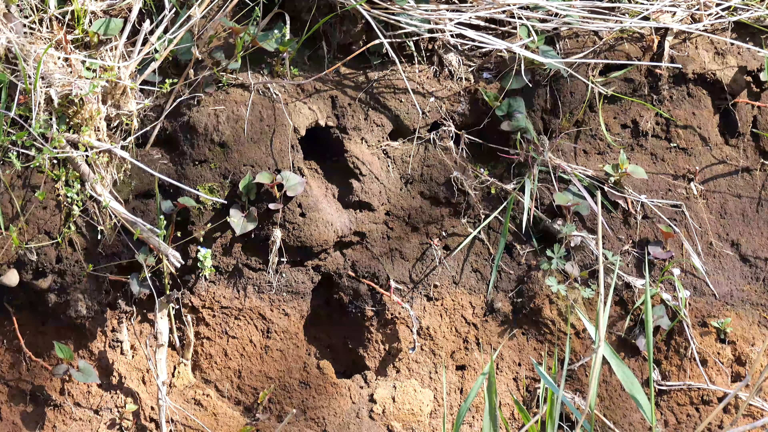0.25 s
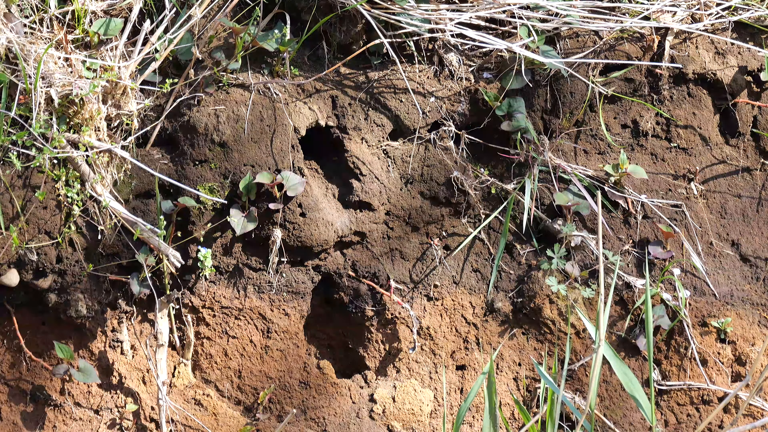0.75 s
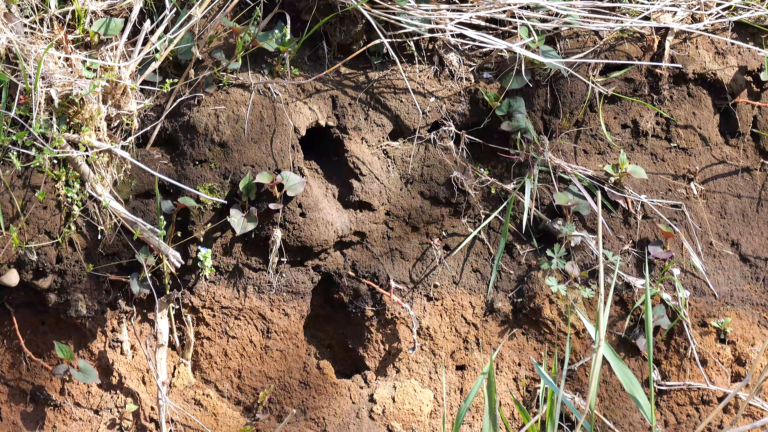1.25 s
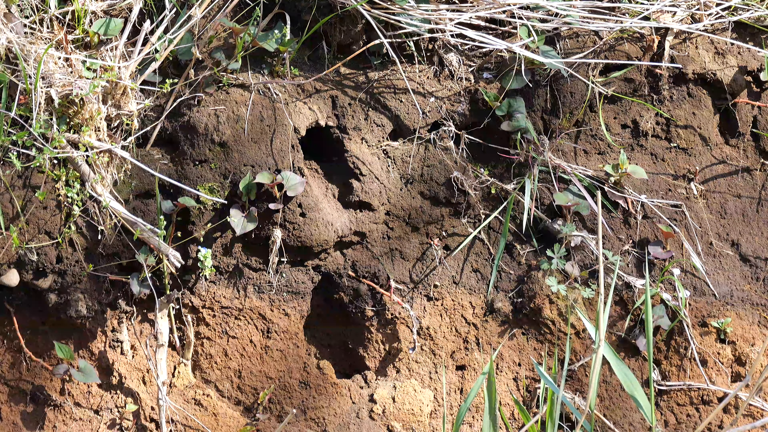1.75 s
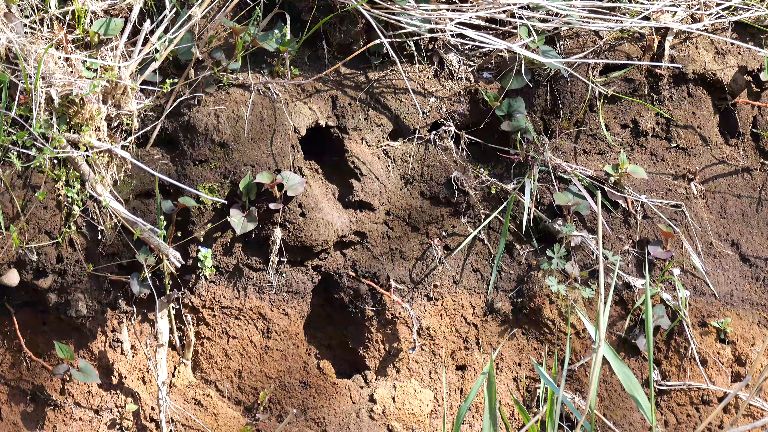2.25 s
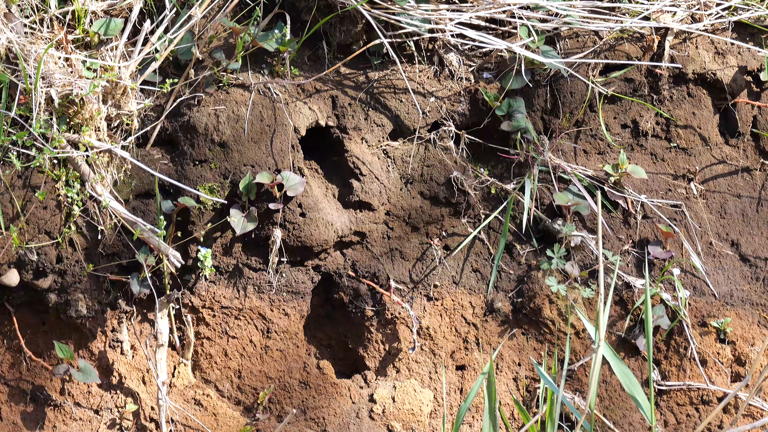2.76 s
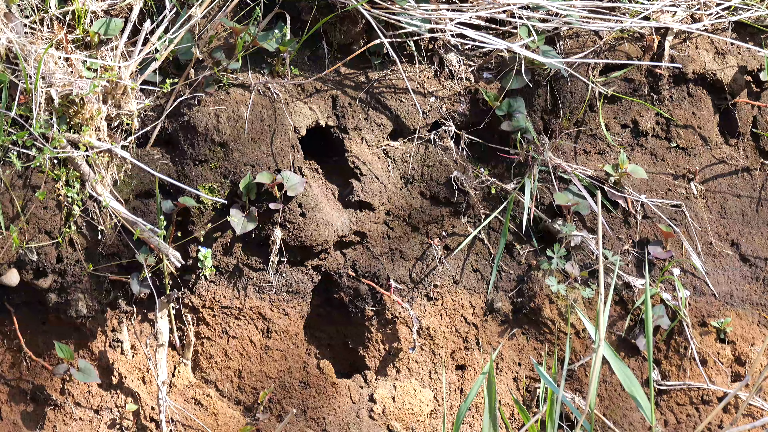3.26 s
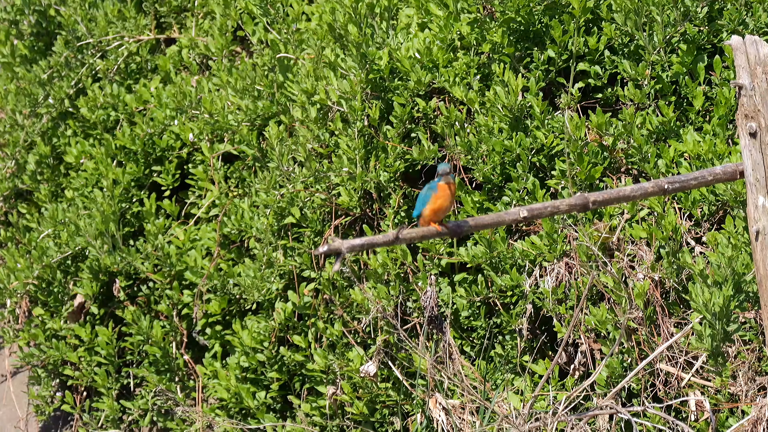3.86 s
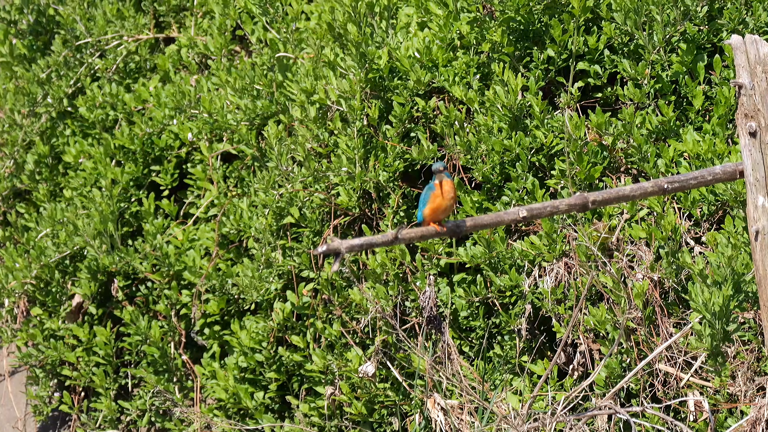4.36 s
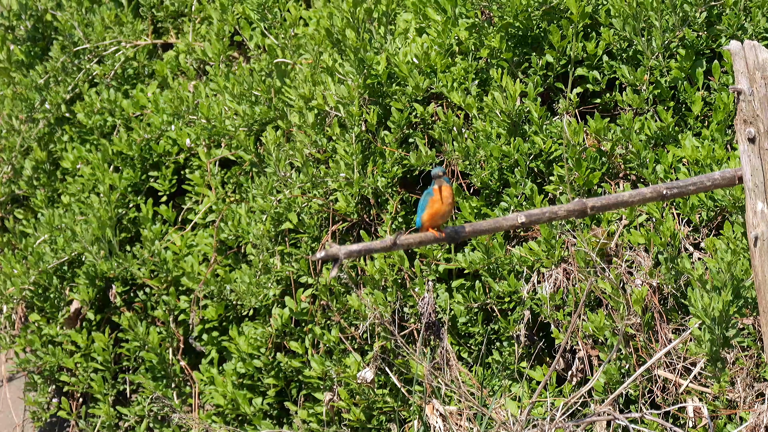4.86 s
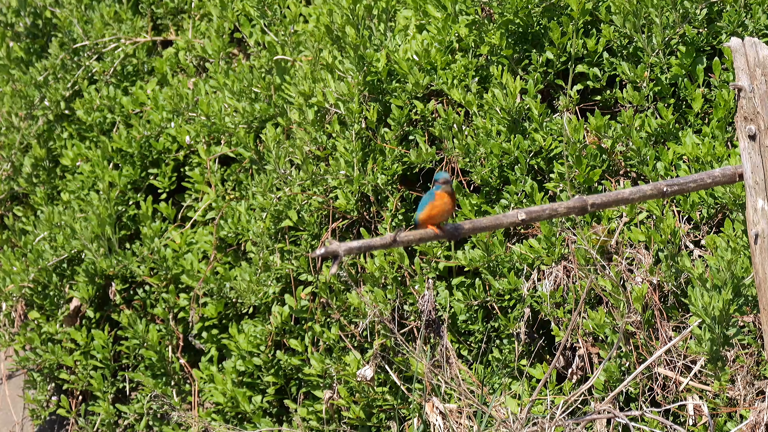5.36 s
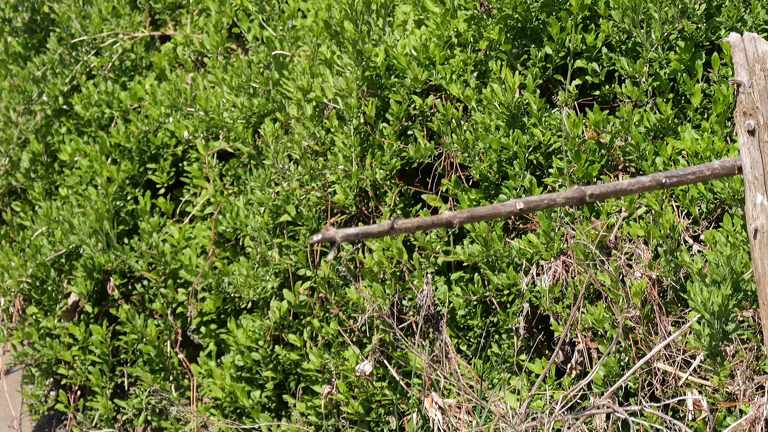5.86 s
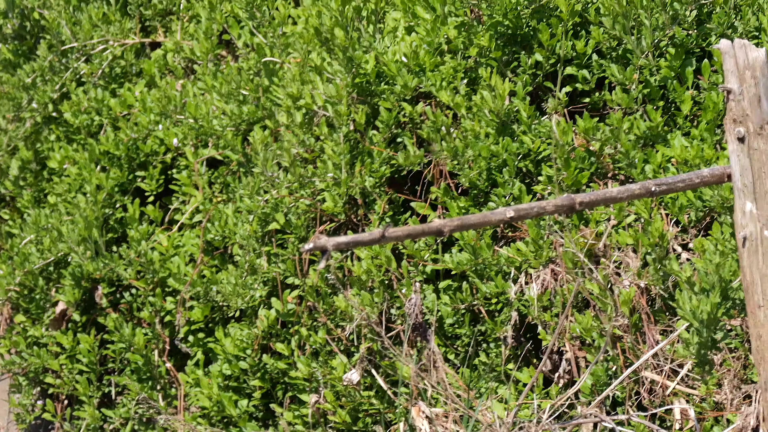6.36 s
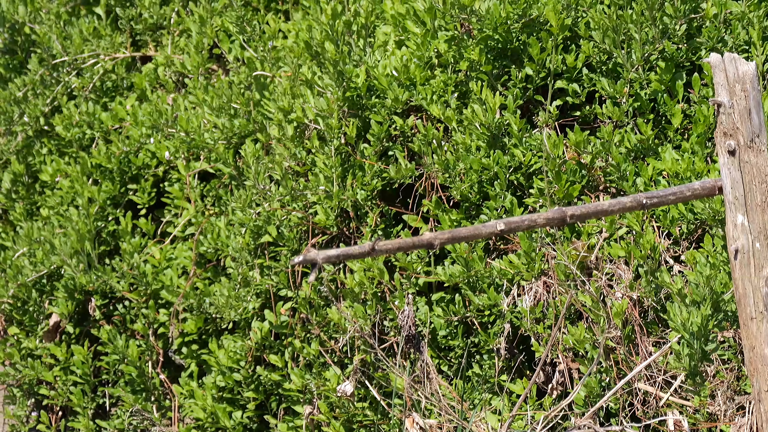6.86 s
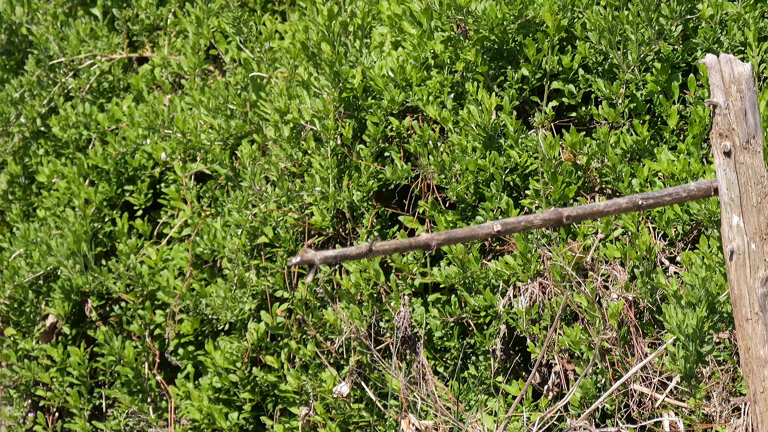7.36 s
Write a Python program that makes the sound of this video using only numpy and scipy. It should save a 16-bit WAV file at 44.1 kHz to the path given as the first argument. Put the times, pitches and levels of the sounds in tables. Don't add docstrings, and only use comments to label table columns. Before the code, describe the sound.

Near road roar and gusty leaves stop suddenly, leaving quick high bird chirps, a twig snap and piercing whistles over faint distant traffic.

```python
import sys
import numpy as np
from scipy import signal
from scipy.fft import rfft, irfft, next_fast_len
from scipy.io import wavfile
from scipy.ndimage import uniform_filter1d

SR = 44100
rng = np.random.default_rng(int(sys.argv[2]) if len(sys.argv) > 2 else 0)


def wrap_up_sound(samples):
    columns = np.atleast_2d(samples).T
    tamed = np.clip(columns, -1, 1)
    steps = np.round(tamed * 32767).astype(np.int16)
    wavfile.write(sys.argv[1], SR, steps)


def nominal_scale(level):
    x = np.asarray(level, float) / 20
    return 10 ** x


N = 335601
CUT_S = 3.688

# f/Hz, level/dB per Hz
RUSTLE_SPECTRUM = [(2000, -8), (4000, 2), (6500, -9), (9000, -20), (11500, -27.5), (14000, -37)]


def unit(x):
    return x / np.sqrt(np.mean(x ** 2) + 1e-20)


def in_time(rows, t):
    s, *columns = np.transpose(rows)
    return [np.interp(t, s, column) for column in columns]


def at_hz(points, hz):
    table_hz, values = np.array(points).T
    return np.interp(np.log(hz), np.log(table_hz), values)


def drift(rate, size):
    r = np.exp(-80 * np.pi * rate / SR)
    noise = rng.standard_normal(size // 40 + 2002)
    slow = signal.lfilter([1], [1, -2 * r, r * r], noise)[2000:]
    return np.interp(np.arange(size) / 40, np.arange(len(slow)), unit(slow))


def wide_noise(spectrum, pair, patchy_db, grain_db, size):
    likeness, balance_db, lead_rad = pair
    hz = np.maximum(np.fft.rfftfreq(size, 1 / SR), 1)
    grains = nominal_scale(grain_db * drift(130, size))
    mid, side = rfft(rng.standard_normal((2, size)) * grains) * nominal_scale(at_hz(spectrum, hz))
    top_likeness = np.clip((13500 - hz) / 5000, 0, 1)
    alike = np.clip(at_hz(likeness, hz), 0, 1) ** 0.772 * top_likeness
    left_right = np.array([[1], [-1]])
    ports = np.sqrt(1 + alike) * mid + np.sqrt(1 - alike) * side * left_right
    tilt = nominal_scale(at_hz(balance_db, hz) * (hz > 250) / 2) * np.exp(.5j * at_hz(lead_rad, hz))
    ports = ports * tilt ** left_right
    out, together = 0, drift(1.54, size)
    for octave in np.arange(4, 15):
        share = np.clip(1 - abs(np.log2(hz) - octave), 0, 1)
        flicker_db = patchy_db * (0.625 * together + drift(11.56, size))
        out = out + irfft(ports * share, size) * nominal_scale(flicker_db)
    return out / np.sqrt(np.mean(out.mean(axis=0) ** 2))


def swells(rows, t):
    power = 0
    for s, db, rise, fall in rows:
        tens_of_db = np.where(t < s, (s - t) / rise, (t - s) / fall)
        power = power + nominal_scale(db - 10 * tens_of_db) ** 2
    return power


def note(rows, overtones, wobble, flutter_db, hoarse):
    start, size = int(rows[0][0] * SR), int((rows[-1][0] - rows[0][0]) * SR)
    t = (start + np.arange(size)) / SR
    hz, level_db = in_time(rows, t)
    hz = uniform_filter1d(hz, size=150, mode="nearest") * (1 + wobble * drift(35.0, size))
    level_db = uniform_filter1d(level_db, size=220, mode="nearest")
    phase = 2 * np.pi * np.cumsum(hz) / SR
    tone = sum(nominal_scale(db) * np.sin(ratio * phase) * (ratio * hz < 15000) for ratio, db in overtones)
    hoarse = np.clip(hoarse, 0, 1)
    tone = tone * (np.sqrt(1 - hoarse) + np.sqrt(hoarse) * drift(300, size))
    edge = np.clip(np.minimum(t - t[0], t[-1] - t) / .0025, 0, 1)
    tone = np.sqrt(2) * tone * edge * nominal_scale(level_db + flutter_db * drift(50, size))
    out = np.zeros(N)
    out[start:start + size] = tone[:N - start]
    return out


def glide(row, bend, fade_db, hook_s=0):
    s, length, first_hz, last_hz, level_db = row
    onset_s, onset_db = 0.0115, -3.5
    u = np.linspace(0, 1, 12)
    hz = first_hz + (last_hz - first_hz) * (1 - (1 - u) ** bend)
    db = level_db + onset_db * np.clip(1 - u * length / onset_s, 0, 1) + fade_db * u
    rows = list(zip(s + u * length, hz, db))
    if hook_s:
        v = u[1:]
        rows += list(zip(s + length + v * hook_s, last_hz * (1 - (1 - .76) * v ** 2), db[-1] + 2.5 * v))
    return rows


def foliage(x, t60, wet_db, smear_hz=200):
    t = np.arange(int(.7 * SR)) / SR
    dull = signal.butter(2, 7000, fs=SR, output="sos")
    shared, left, right = signal.sosfilt(dull, rng.standard_normal((3, len(t))))
    tail = shared + 0.564 * np.array([left, right])
    tail = tail * nominal_scale(-60 * t / t60) * np.clip(t / 0.0059, 0, 1)
    tail = tail / np.sqrt(np.mean(np.sum(tail ** 2, axis=1)))
    moving = x * (.6 + .8 * drift(smear_hz, N))
    return x + nominal_scale(wet_db) * signal.fftconvolve(moving[None], tail, axes=1)[:, :N]


def bank(t):
    # f/Hz, level/dB per Hz
    road_spectrum = [(15, -75), (25, -45.5), (42, -40.5), (60, -26), (102, -7.5), (187, -2.5), (278, -4.5),
                     (403, -10), (1070, -15), (2710, -25), (4030, -29.5), (5540, -42), (8020, -46.5),
                     (14000, -80)]
    # f/Hz, level/dB per Hz
    leaf_spectrum = [(1500, -21), (2500, -20), (3800, 3), (5000, -5.5), (7000, -16.5), (10000, -52)]
    # f/Hz, likeness; f/Hz, L-R level/dB; f/Hz, left lead/rad
    pair = [(60, 0.995), (130, .998), (280, .995), (610, 0.978), (1330, 0.554), (2880, 0.69), (6240, 0.575),
            (13500, 0.29)], [(60, -3.5), (110, -1.5), (200, 0.0), (370, -1.0), (670, -3.5), (1220, -7),
            (2220, -6), (4060, -2.5), (7420, -6.5), (13500, -2.0)], [(300, 0), (1120, 0.23), (1720, 1),
            (2840, 0.51), (5170, 0.021), (9000, .2)]
    # t/s, level/dB
    road_levels = [(0, -25.5), (.6, -25), (1.4, -27.5), (2.0, -28.5), (3.05, -25), (3.25, -27), (3.68, -26)]
    # t/s, level/dB
    breeze = [(0, -53.5), (.3, -42), (1.4, -40.5), (1.95, -47), (2.15, -42), (3.0, -46.5), (3.25, -42),
              (3.68, -48.5)]
    # peak t/s, level/dB, rise/s per 10 dB, fall/s per 10 dB
    gusts = [
        (.275, -36.5, .03, 0.1),
        (.404, -34, .1, .12),
        (.45, -36, .1, 0.09),
        (.505, -35, 0.086, .15),
        (.72, -35, .015, .1),
        (1.29, -39, .02, 0.21),
        (2.57, -41, 0.031, 0.01),
    ]
    # peak t/s, level/dB, rise/s per 10 dB, fall/s per 10 dB
    brushes = [
        (.05, -53, 0.056, .5),
        (.402, -43.5, .02, .08),
        (.475, -41.5, .025, 0.062),
        (.52, -42, .04, 0.0347),
        (.72, -57, .015, 0.01),
    ]
    (road_db,), (breeze_db,) = in_time(road_levels, t), in_time(breeze, t)
    leaf_gain = np.sqrt(nominal_scale(breeze_db) ** 2 + swells(gusts, t))
    rustle_db = -63 + 0.55 * (breeze_db - breeze_db.mean())
    rustle_gain = np.sqrt(nominal_scale(rustle_db) ** 2 + swells(brushes, t))
    road = wide_noise(road_spectrum, pair, patchy_db=0.8276, grain_db=0.2, size=len(t))
    leaves = wide_noise(leaf_spectrum, pair, patchy_db=1.4, grain_db=1.2, size=len(t))
    rustle = wide_noise(RUSTLE_SPECTRUM, pair, patchy_db=0.5, grain_db=0.0, size=len(t))
    return nominal_scale(road_db - 0.2) * road + nominal_scale(-3.5) * leaf_gain * leaves + nominal_scale(11) * rustle_gain * rustle


def engines():
    # t/s, length/s, first f/Hz, last f/Hz, level/dB
    drones = [
        (.001, .6, 149, 144, -37),
        (.001, .55, 211, 207, -32),
        (.001, .65, 274, 265, -36),
        (.8, 1.0, 266, 260, -38),
        (1.2, .7, 186, 182, -40),
        (2.3, .85, 187, 191, -36),
        (3.2, .5, 186, 188, -37),
        (2.95, .7, 82, 72, -47),
        (.05, .45, 85, 68, -44),
    ]
    u = np.linspace(0, 1, 9)
    out = 0
    for s, length, first_hz, last_hz, db in drones:
        rows = list(zip(s + u * length, first_hz + (last_hz - first_hz) * u, db - 8 * (2 * u - 1) ** 4))
        out = out + note(rows, [(1, 0)], wobble=.008, flutter_db=2, hoarse=0)
    return out


def thicket(t):
    # f/Hz, level/dB per Hz
    road_spectrum = [(15, -87.5), (25, -43.5), (136, -1), (208, -3.5), (237, -6), (301, -3.5), (372, -15.5),
                     (414, -11.5), (448, -15), (868, -18.5), (2860, -28.5), (3350, -27), (5840, -39),
                     (9500, -54), (14000, -61)]
    # f/Hz, likeness; f/Hz, L-R level/dB; f/Hz, left lead/rad
    pair = [(60, 1), (130, 1), (280, 1), (610, 0.983), (1330, 0.586), (2880, 0.77), (6240, 0.566),
            (13500, 0.16)], [(60, -7), (110, -4.5), (200, 0.0), (370, 0), (670, 2), (1220, 5), (2220, 2.0),
            (4060, 0.5), (7420, 0), (13500, -1)], [(300, 0.0025), (2240, -0.94), (4220, 0.16)]
    # t/s, level/dB
    road_levels = [(3.7, -43.5), (4.8, -43), (5.7, -43), (6.14, -41.5), (6.4, -43), (6.99, -43.5),
                   (7.1, -43), (7.61, -43.5)]
    # t/s, level/dB
    stir = [(3.7, -66), (4.86, -62), (5.0, -68.5), (5.3, -67), (5.4, -62.5), (5.65, -75), (6.0, -61.5),
            (6.2, -60), (6.4, -63.5), (6.97, -65), (7.05, -76), (7.61, -77)]
    (road_db,), (leaf_db,) = in_time(road_levels, t), in_time(stir, t)
    road = wide_noise(road_spectrum, pair, patchy_db=0.77, grain_db=0.87, size=len(t))
    leaves = wide_noise(RUSTLE_SPECTRUM, pair, patchy_db=3.0, grain_db=0.5, size=len(t))
    return nominal_scale(road_db + 3.5) * road + nominal_scale(leaf_db + 7) * leaves


def puffs():
    # t/s, level/dB, brightness f/Hz, length/s
    bursts = [(.12, -33, 327, 0.252), (0.328, -44, 70, 0.046), (3.33, -44.5, 90, 0.147),
              (6.097, -37, 1490, 0.0049), (6.117, -39.5, 1390, 0.0058), (6.119, -47, 3200, 0.0049),
              (6.133, -38.5, 1200, 0.0049), (6.134, -45, 3400, .004), (6.116, -37.5, 557, 0.0306),
              (6.108, -50, 2600, 0.036), (4.896, -45, 3500, .005), (4.915, -45, 1100, .03),
              (6.163, -41, 400, 0.0062), (6.194, -60.5, 7000, 0.034), (7.586, -37, 200, 0.0153)]
    out = np.zeros(N)
    for s, level_db, hz, length in bursts:
        at = np.arange(max(round((s - .6) * SR), 0), min(round((s + .6) * SR), N))
        air = rng.standard_normal(2 * SR)
        band = unit(signal.sosfilt(signal.butter(2, [hz / 3, hz], "band", fs=SR, output="sos"), air))
        out[at] += nominal_scale(level_db) * band[-len(at):] * np.exp(-((at / SR - s) / length) ** 2)
    return signal.sosfilt(signal.butter(3, 55, "high", fs=SR, output="sos"), out)


def ticks():
    # t/s, level/dB, ring f/Hz, t60/s, crack level/dB
    snaps = [
        (4.881, -30, 2890, 0.0195, -56),
        (4.885, -39, 2510, 0.019, -60.5),
        (4.8934, -34, 3310, 0.0122, -39),
        (4.8966, -32, 2880, .012, -43.5),
        (4.8995, -35.5, 2505, 0.011, -47.5),
        (4.896, -31.5, 849, .025, -60.5),
        (4.917, -39, 3910, .012, -54.5),
    ]
    out, t = np.zeros(N), np.arange(1500) / SR
    crack_band = signal.butter(3, [3000, 8500], "band", fs=SR, output="sos")
    for s, level_db, hz, t60, crack_db in snaps:
        crack = signal.sosfilt(crack_band, rng.standard_normal(len(t))) * nominal_scale(crack_db - 60 * t / 0.0183)
        ring = nominal_scale(level_db - 60 * t / t60) * np.sin(2 * np.pi * hz * t) * np.clip(t / 0.00041, 0, 1)
        out[round(s * SR):][:len(t)] += ring + crack
    return foliage(out, t60=.15, wet_db=-10)


def chirps():
    # t/s, length/s, first f/Hz, last f/Hz, level/dB
    far_chirps = [
        (3.166, 0.0356, 3833, 4315, -44.5),
        (3.215, 0.0301, 3950, 4216, -44.5),
        (3.464, .02, 4550, 4700, -48.5),
    ]
    # t/s, length/s, first f/Hz, last f/Hz, level/dB
    squeak = (0.462, 0.085, 7049, 5900, -38)
    notes = 0
    for row in far_chirps:
        rows = glide(row, bend=1.2, fade_db=0)
        notes = notes + note(rows, [(1, 0)], wobble=.005, flutter_db=1.5, hoarse=.05)
    squeak_rows = glide(squeak, bend=1.1, fade_db=-7)
    notes = notes + note(squeak_rows, [(1, 0)], wobble=.04, flutter_db=3, hoarse=.9)
    return foliage(notes, t60=.2, wet_db=-8, smear_hz=80) * nominal_scale(np.array([[-1.5], [1.5]]))


def whistle(row, fade_db):
    s, length, top_hz, last_hz, level_db = row
    t = np.linspace(0, length, 40)
    scoop = np.clip(1 - t / .011, 0, 1) ** 2
    sag = (t / length) ** 2.6
    hz = top_hz * (1 - (1 - .9) * scoop) - (top_hz - last_hz) * sag
    return list(zip(s + t, hz, level_db - 4 * scoop + fade_db * sag))


def whistler():
    # t/s, length/s, top f/Hz, last f/Hz, level/dB
    short_whistles = [
        (7.181, 0.0638, 6250, 5250, -35),
        (7.59, .014, 6250, 6150, -54),
    ]
    # t/s, f/Hz, level/dB
    long_whistles = [
        [(6.327, 5600, -52), (6.333, 5730, -43), (6.34, 5794, -38), (6.366, 5574, -43), (6.375, 5450, -51),
         (6.384, 5150, -49), (6.394, 4950, -54)],
        [(4.612, 5080, -70), (4.618, 5599, -54), (4.636, 5630, -48), (4.682, 5485, -49.5), (4.698, 5423, -63.5),
         (4.706, 5453, -47), (4.718, 5226, -50.5), (4.824, 5097, -58), (4.84, 5332, -73.5)],
        [(7.36, 5430, -57.5), (7.368, 5580, -38), (7.376, 5750, -40), (7.386, 5716, -37), (7.394, 5400, -44),
         (7.402, 5594, -40), (7.41, 5656, -47.5), (7.424, 5503, -39.5), (7.44, 5398, -54.5)],
        [(7.44, 5595, -47.5), (7.454, 5690, -31), (7.48, 5504, -40.5), (7.5, 5644, -34), (7.538, 5432, -39),
         (7.56, 5300, -43), (7.588, 5400, -60)],
    ]
    pans = [-3, -1.2, -1.4, 4, -3.5, -3]
    echo_levels = [0, 0, 2, 0, -2, -7]
    # f/Hz, level/dB, t60/s
    earlier_whistle = (5400, -60.5, 1.2)
    calls = [whistle(row, fade_db=-11.5) for row in short_whistles] + list(long_whistles)
    notes = [note(rows, [(1, 0), (2, -33.0)], wobble=.003, flutter_db=2, hoarse=.03) for rows in calls]
    direct = sum(x * nominal_scale(np.array([[pan], [-pan]]) / 2) for x, pan in zip(notes, pans))
    thrown = sum(x * nominal_scale(db) for x, db in zip(notes, echo_levels))
    echoes = foliage(thrown, t60=.45, wet_db=-10, smear_hz=70) - thrown
    hz, level_db, t60 = earlier_whistle
    dying = [(CUT_S, hz, level_db), (CUT_S + t60 / 4, hz, level_db - 16.5)]
    return direct + echoes + note(dying, [(0.99, 0)], wobble=0.0027, flutter_db=2.5, hoarse=.3)


def stroke(row):
    s, length, low_hz, high_hz, level_db = row
    u = np.linspace(0, 1, 11)
    height = 1 - abs(2 * u - 1) ** 1.4
    return list(zip(s + u * length, low_hz + (high_hz - low_hz) * height, level_db - 5 * height))


def twitter():
    # t/s, length/s, first f/Hz, last f/Hz, level/dB
    sweep_rows = [(3.916, 0.11, 5690, 7560, -60), (4.331, 0.094, 5350, 7760, -61),
                  (4.715, 0.118, 3900, 7530, -55.5), (5.135, 0.154, 3950, 7840, -61.5),
                  (5.566, 0.14, 3790, 7840, -65), (6.522, .05, 6000, 9200, -66),
                  (6.76, .07, 6200, 8000, -65)]
    # t/s, length/s, first f/Hz, last f/Hz, level/dB
    arch_rows = [
        (3.835, .088, 3943, 4927, -44),
        (7.325, .1, 3477, 5043, -53),
    ]
    # t/s, length/s, first f/Hz, last f/Hz, level/dB
    low_arch_rows = [(5.965, .052, 3200, 3895, -50)]
    # t/s, length/s, first f/Hz, last f/Hz, level/dB
    rise_rows = [(3.72, .05, 4120, 5230, -55), (4.27, .055, 4100, 4420, -46),
                 (4.085, 0.0183, 4000, 4850, -50), (6.525, 0.0138, 2800, 4300, -52),
                 (6.21, 0.0197, 3800, 4700, -52), (4.93, 0.072, 4700, 5650, -62),
                 (5.3, .05, 4900, 5250, -56.5), (6.23, .08, 4800, 5750, -60.5),
                 (7.52, .055, 2930, 3800, -54), (7.575, .03, 3950, 4580, -69.5)]
    # t/s, length/s, first f/Hz, last f/Hz, level/dB
    croak_rows = [(4.455, 0.114, 3420, 3300, -53), (4.61, 0.051, 4534, 4286, -51.5),
                  (5.325, .04, 3200, 3700, -47), (5.36, .05, 3500, 3400, -52),
                  (5.355, .025, 3950, 4050, -45), (5.38, .04, 4050, 3850, -49),
                  (5.785, 0.02, 4563, 4800, -51), (5.33, .03, 6900, 7100, -58),
                  (6.416, 0.02, 4300, 4100, -42), (6.83, .05, 4145, 4364, -51.5)]
    # t/s, length/s, first f/Hz, last f/Hz, level/dB
    flick_rows = [(3.96, 0.0123, 3060, 3060, -50.5), (4.026, 0.015, 2988, 2930, -49.5),
                  (4.04, 0.02234, 4025, 2412, -55), (4.37, .015, 4200, 4900, -53),
                  (4.706, .012, 3900, 4100, -52), (6.008, .02, 4400, 4800, -54),
                  (5.805, .012, 4800, 4400, -52), (4.426, .02, 5200, 3800, -46),
                  (4.443, .018, 3900, 3450, -51), (4.574, .01, 4500, 3600, -54),
                  (4.017, .03, 6300, 4285, -58), (4.845, .03, 4300, 3010, -53.5),
                  (5.697, .008, 4510, 3800, -48), (6.143, .014, 4910, 3505, -51),
                  (6.16, .03, 3003, 3405, -53), (6.396, .008, 4900, 3800, -50),
                  (6.404, .011, 4700, 3750, -45), (6.448, .011, 4300, 3450, -48),
                  (6.745, .012, 5000, 4200, -50), (6.856, .012, 3000, 1900, -54),
                  (6.727, .03, 8120, 4350, -52)]
    # t/s, f/Hz, level/dB
    phrases = [
        [(4.43, 5010, -56.5), (4.45, 6250, -52.5), (4.48, 6750, -56), (4.565, 6720, -55.5),
         (4.583, 5000, -54.5), (4.594, 5820, -52), (4.604, 5300, -52.5), (4.613, 4300, -49)],
        [(4.11, 4500, -53), (4.135, 5200, -51.5), (4.16, 5400, -53), (4.167, 5200, -48.5), (4.172, 4200, -46.5),
         (4.176, 3700, -52)],
        [(4.186, 3850, -50), (4.193, 4350, -45), (4.197, 4350, -45), (4.202, 3400, -51), (4.209, 2200, -53)],
        [(4.49, 3600, -51), (4.504, 4750, -52.5), (4.53, 5250, -55), (4.56, 5600, -60.5)],
        [(5.708, 4000, -52), (5.725, 3600, -52), (5.75, 4000, -44.5), (5.768, 3500, -51)],
        [(6.05, 5600, -53.5), (6.064, 4300, -46.5), (6.078, 5200, -51), (6.09, 3900, -51)],
        [(6.762, 2900, -56), (6.785, 3600, -53), (6.82, 3900, -51), (6.842, 4350, -47), (6.856, 3000, -53)],
        [(6.495, 3870, -62.5), (6.52, 4200, -50), (6.545, 4370, -43), (6.58, 4830, -42), (6.63, 5270, -45),
         (6.685, 5390, -44), (6.722, 4700, -45.5), (6.74, 3180, -53), (6.755, 2510, -54.5)],
    ]
    # t/s, length/s, low f/Hz, high f/Hz, end level/dB
    stroke_rows = [(3.942, .021, 4050, 5200, -44), (3.966, .025, 3900, 5000, -44),
                   (3.996, .013, 3900, 4850, -45), (4.011, .014, 3650, 4650, -46),
                   (4.03, .017, 3900, 4500, -48), (4.176, .011, 3800, 4400, -48),
                   (6.434, .011, 3500, 4300, -47), (4.1, .012, 3900, 4700, -51)]
    # (ratio to the strongest partial, dB)
    thin, plain = [(1, 0), (2 / 3, -14)], [(1, 0), (1.5, -25)]
    rich, rough = [(1, 0), (.5, -20), (1.5, -10), (2, -17)], [(1, 0), (1.5, -19), (2, -30)]
    calls = [(glide(r, bend=2.4, fade_db=-15, hook_s=.014), thin, .07) for r in sweep_rows]
    calls += [(glide(r, bend=1.8, fade_db=-3, hook_s=.014), plain, .07) for r in arch_rows]
    calls += [(glide(r, bend=2.1, fade_db=-1, hook_s=.028), rich, .1) for r in low_arch_rows]
    calls += [(glide(r, bend=2.993, fade_db=-7), plain, .07) for r in rise_rows]
    calls += [(glide(r, bend=2.5, fade_db=-5.5), rough, .4) for r in croak_rows]
    calls += [(glide(r, bend=1.3, fade_db=-1.5), plain, .15) for r in flick_rows]
    calls += [(rows, plain, .05) for rows in phrases]
    calls += [(stroke(r), plain, .1) for r in stroke_rows]
    notes = sum(note(rows, voice, wobble=.003, flutter_db=1.5, hoarse=hoarse) for rows, voice, hoarse in calls)
    return foliage(notes, t60=.17, wet_db=-7.5, smear_hz=220)


def scene():
    t, size = np.arange(N) / SR, next_fast_len(N // 2 + 8000)
    after = np.clip((t - CUT_S) / .003 + .5, 0, 1)
    first = chirps() + engines()
    second = twitter() + whistler() + ticks()
    first[:, :size] += bank(t[:size])
    second[:, -size:] += thicket(t[-size:])
    return first * (1 - after) + second * after + puffs()


def low_pass(x):
    return signal.sosfilt(signal.butter(12, 14240, fs=SR, output="sos"), x)


def record(dry):
    sample = np.arange(N)
    bass_cut = signal.butter(2, 45, "high", fs=SR, output="sos")
    ports = signal.sosfilt(bass_cut, dry * np.clip(sample / 150, 0, 1))
    ports = ports * np.clip(sample[::-1] / 60, 0, 1)
    return low_pass(ports)


dry = scene()
out = record(dry)
wrap_up_sound(out)
```